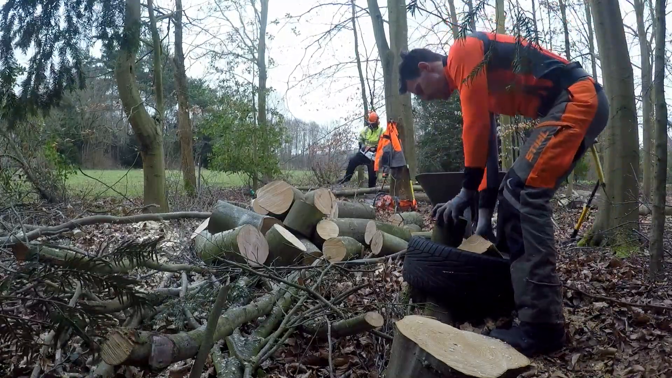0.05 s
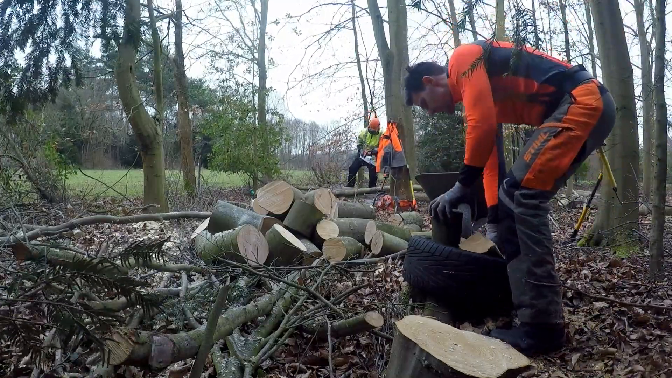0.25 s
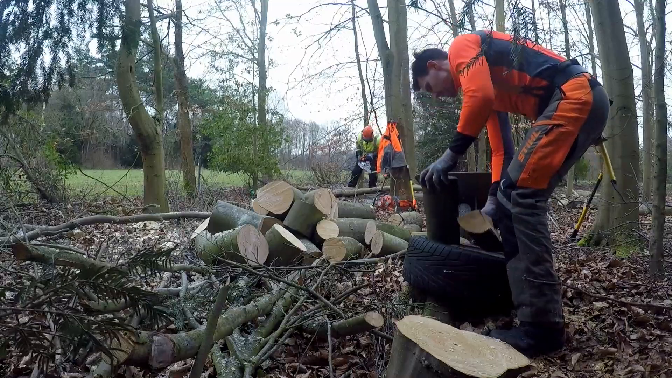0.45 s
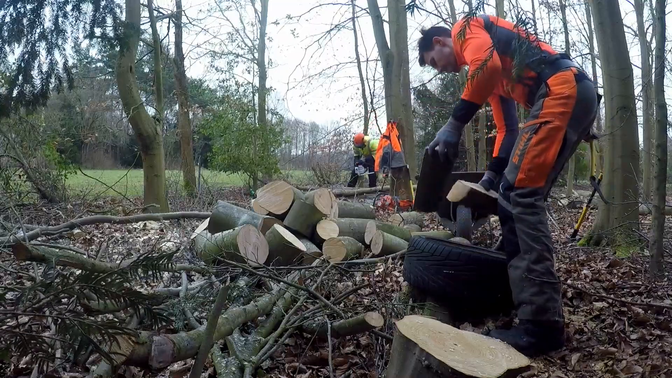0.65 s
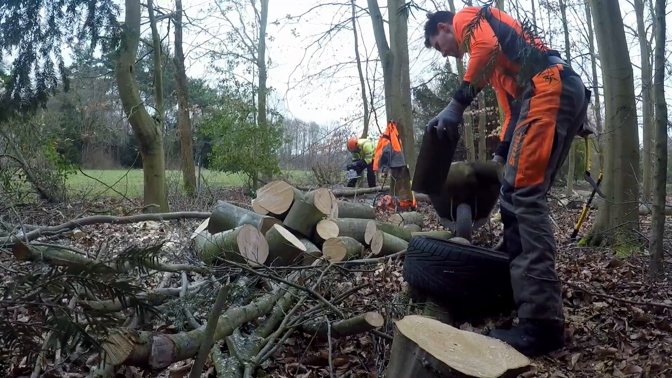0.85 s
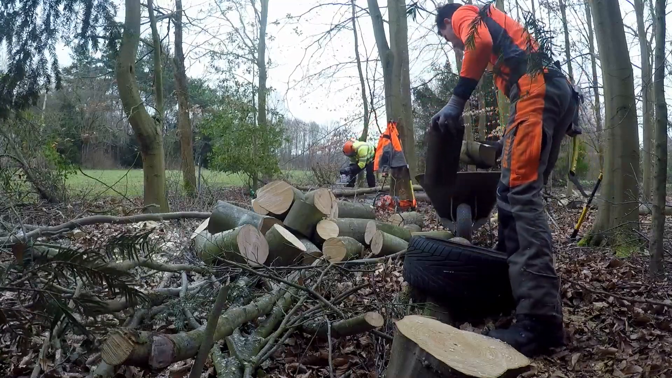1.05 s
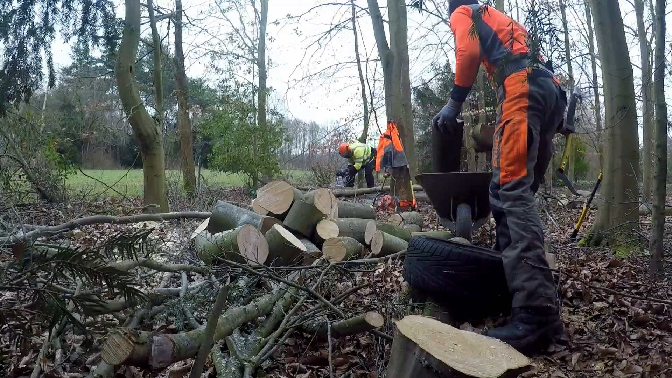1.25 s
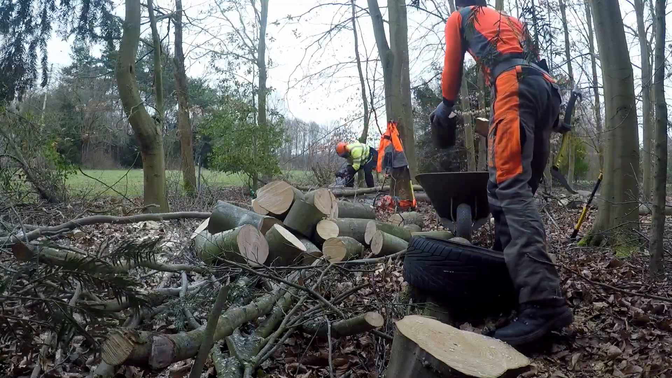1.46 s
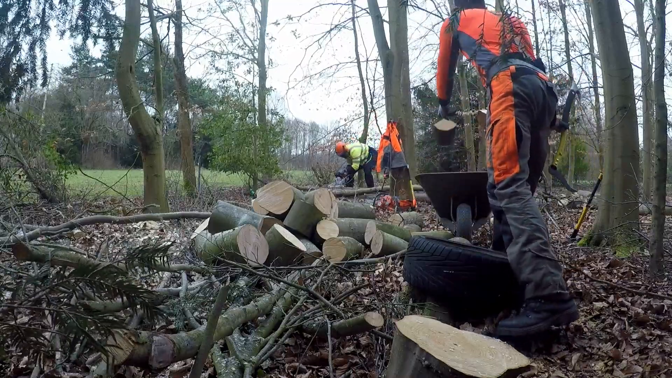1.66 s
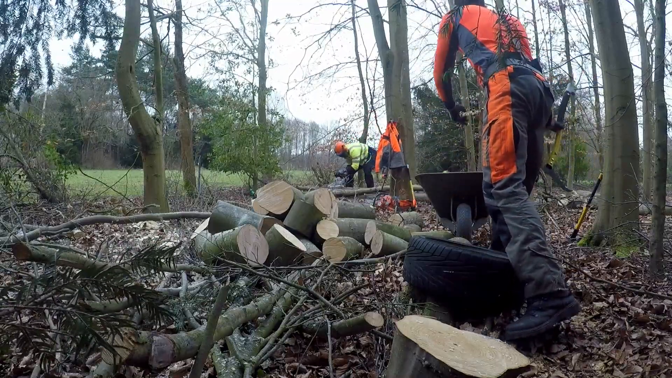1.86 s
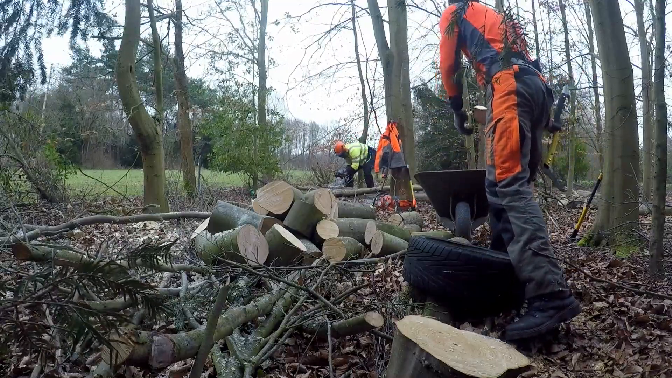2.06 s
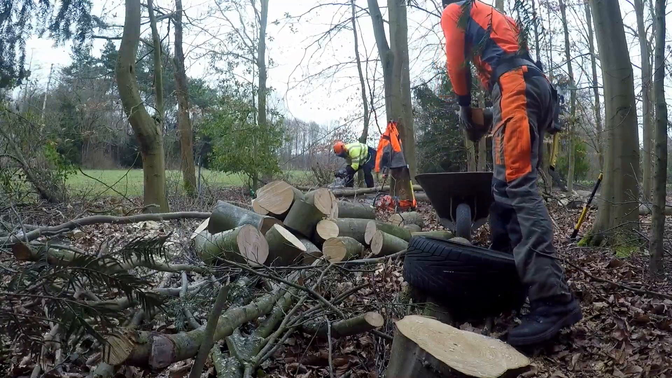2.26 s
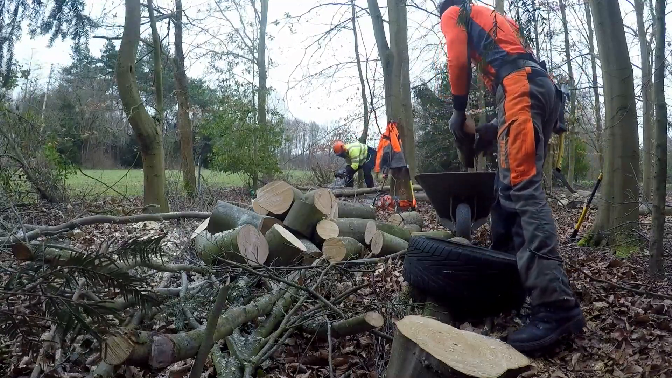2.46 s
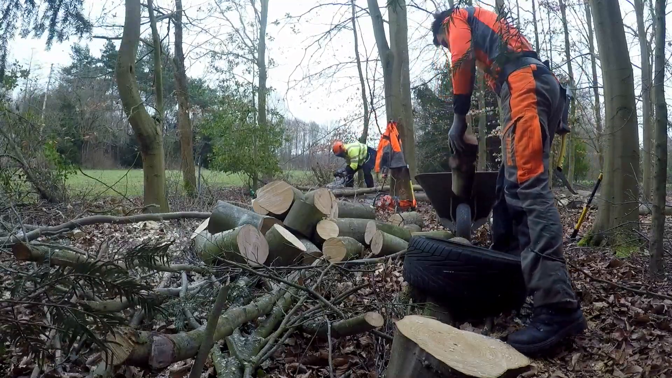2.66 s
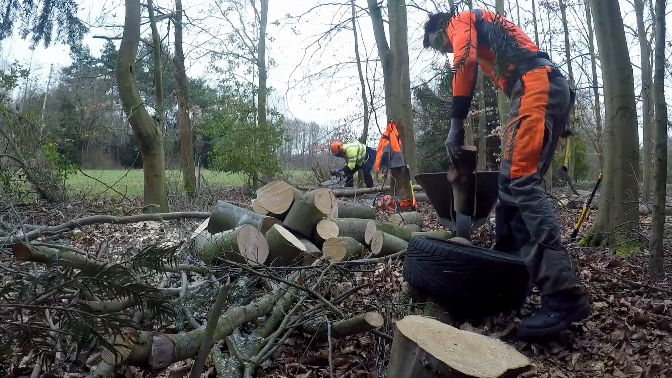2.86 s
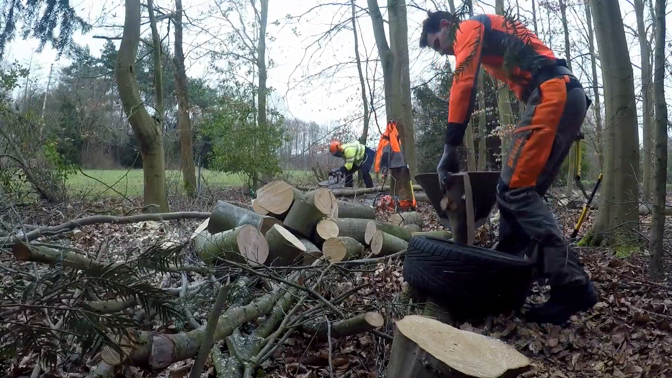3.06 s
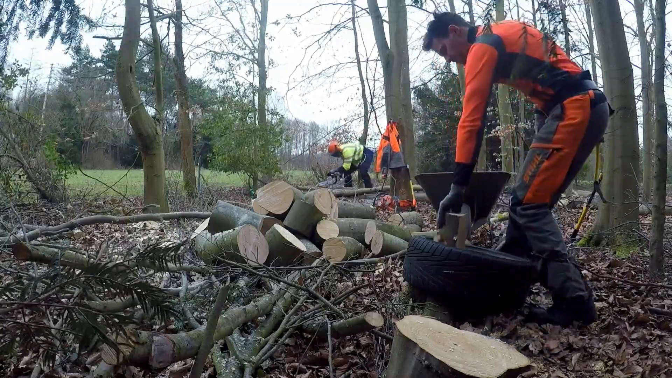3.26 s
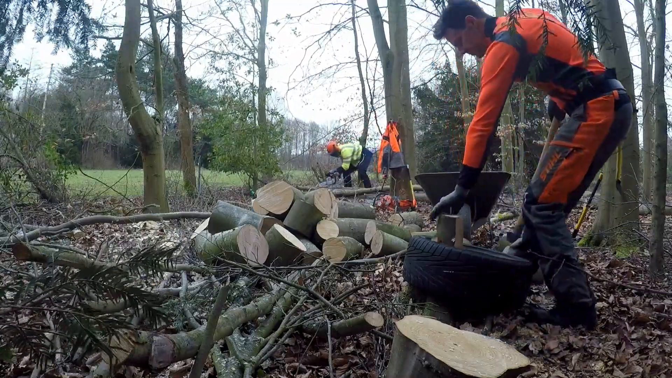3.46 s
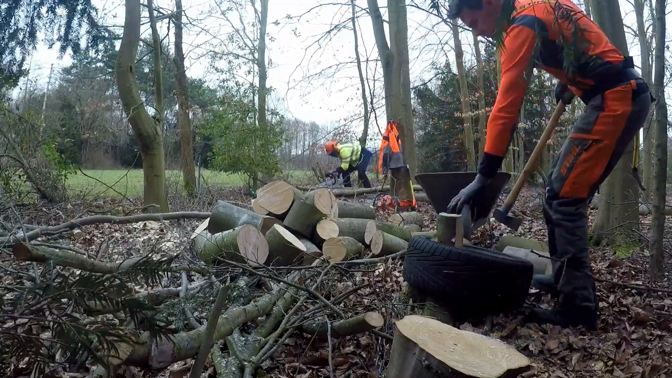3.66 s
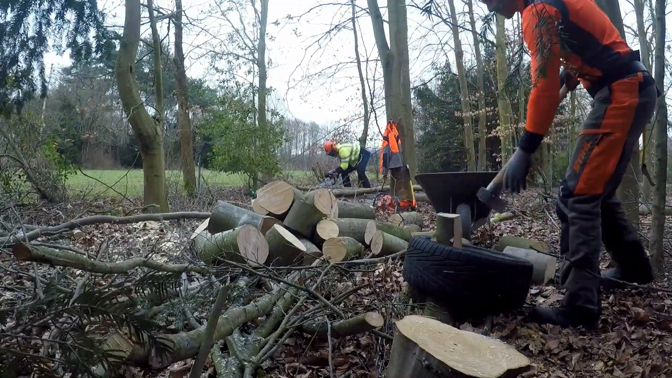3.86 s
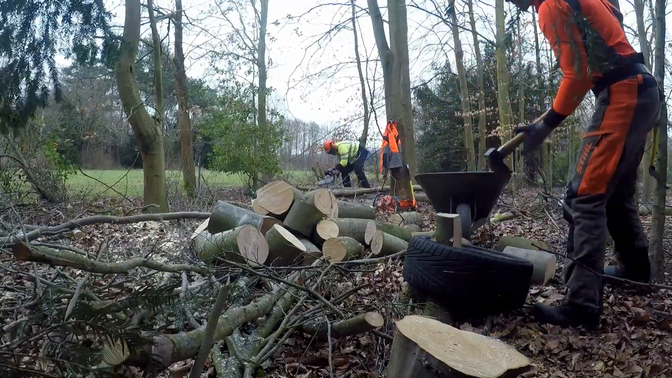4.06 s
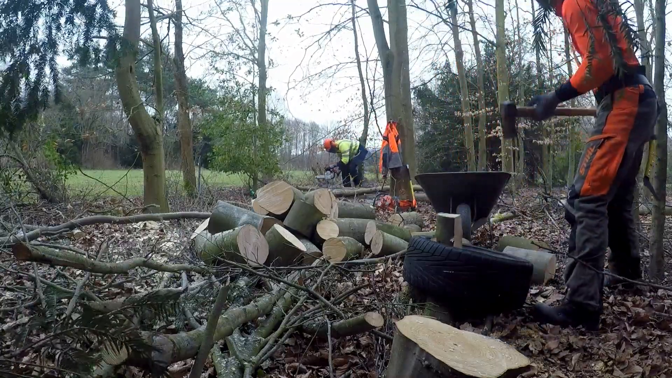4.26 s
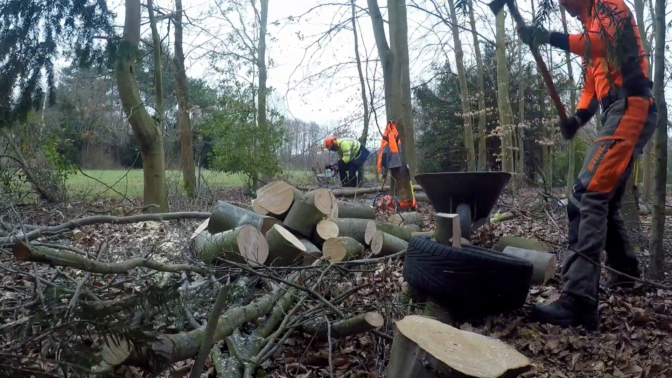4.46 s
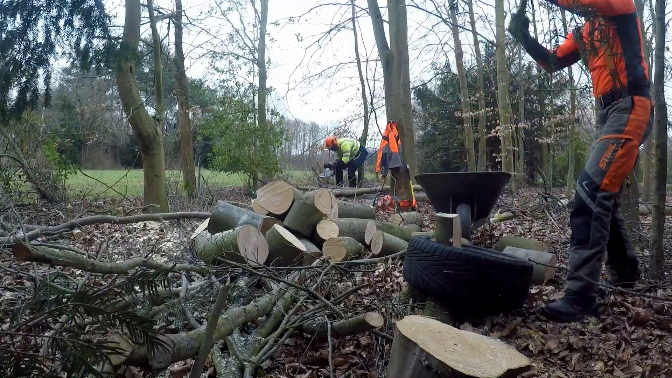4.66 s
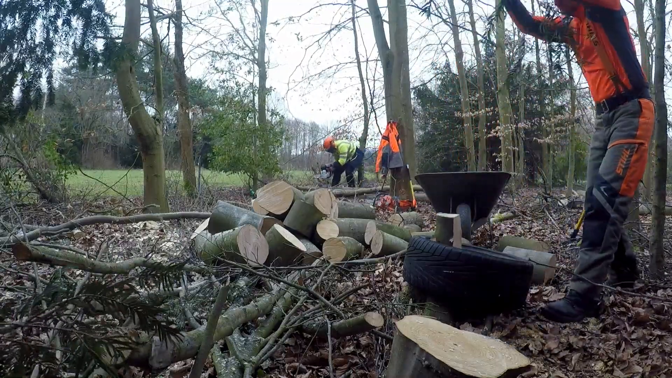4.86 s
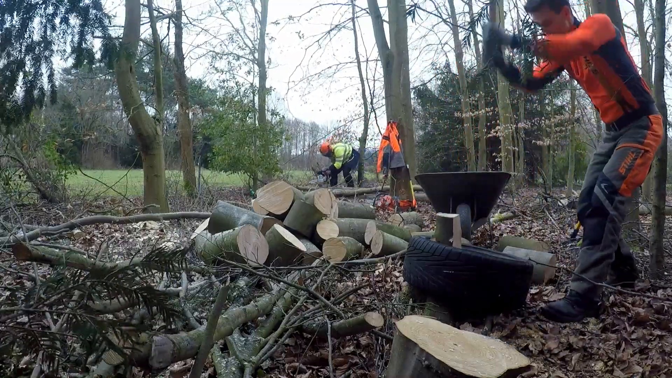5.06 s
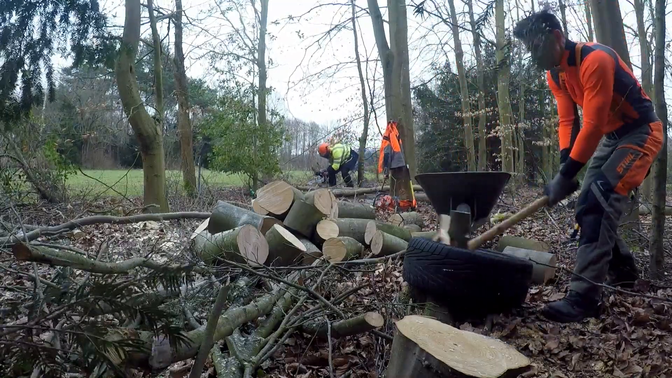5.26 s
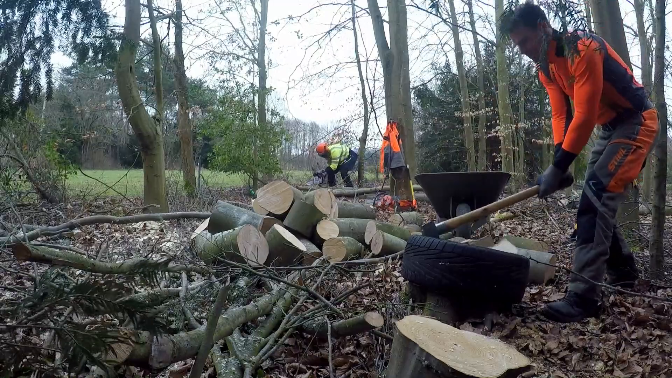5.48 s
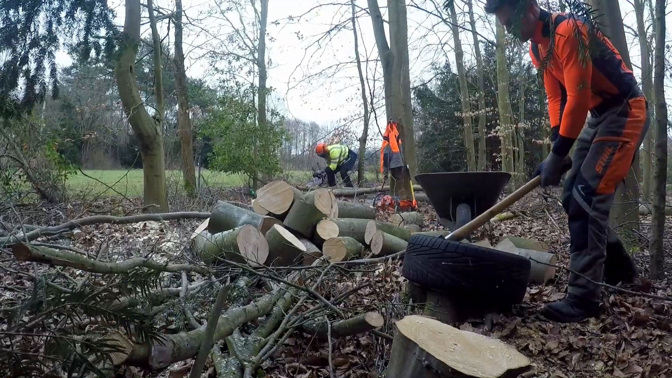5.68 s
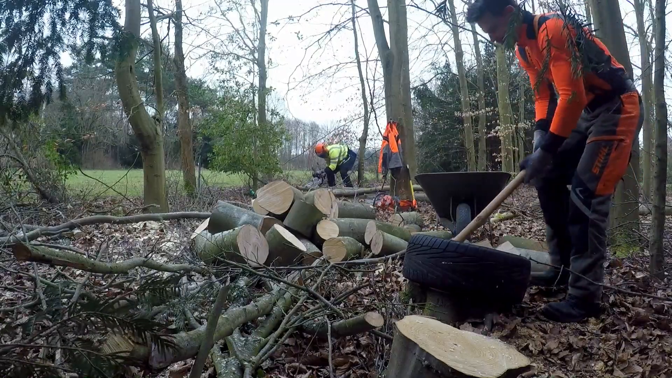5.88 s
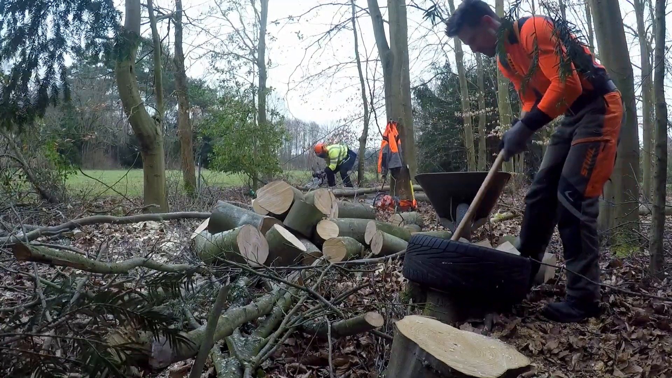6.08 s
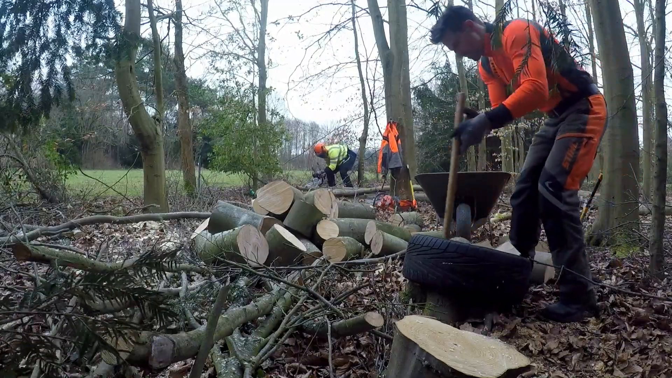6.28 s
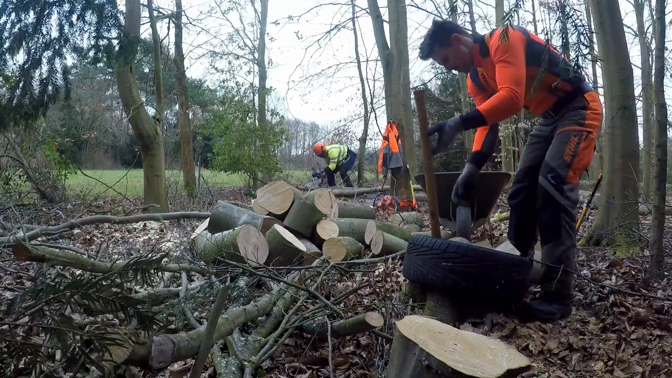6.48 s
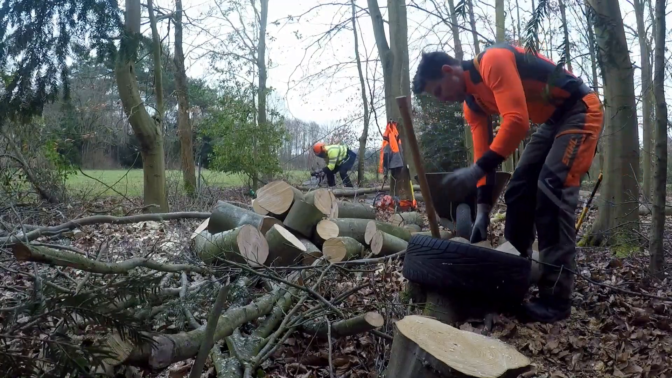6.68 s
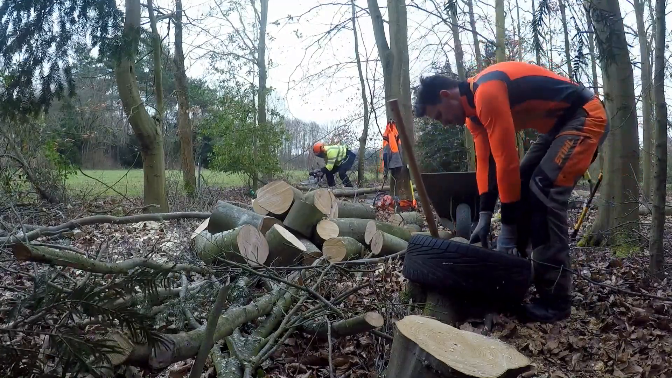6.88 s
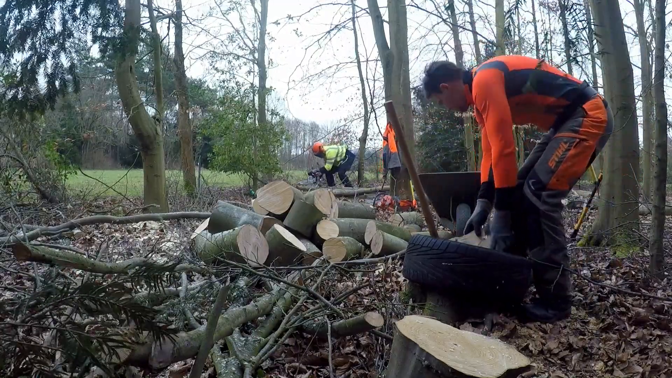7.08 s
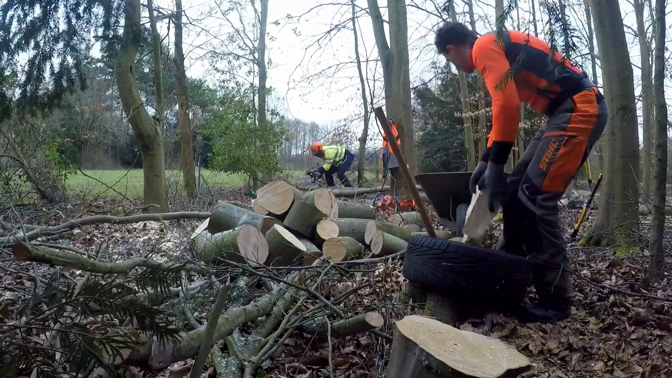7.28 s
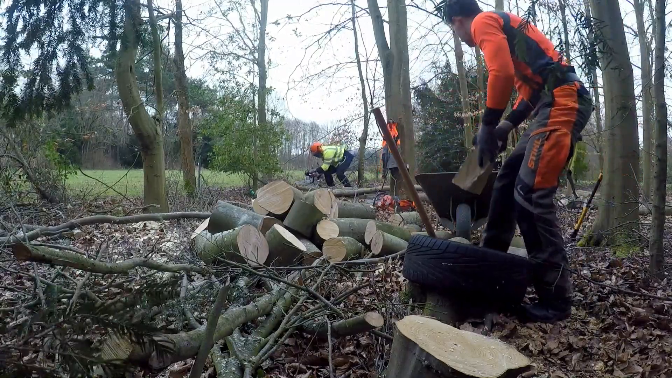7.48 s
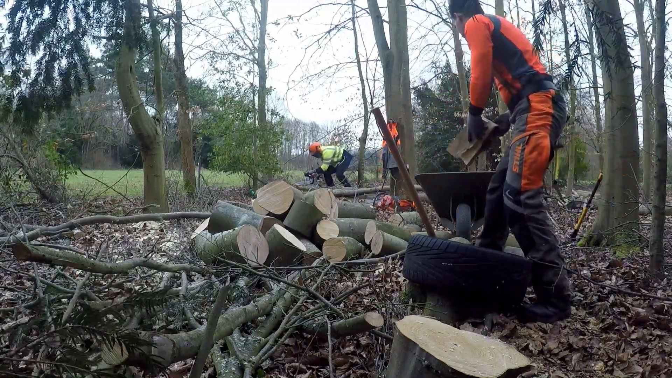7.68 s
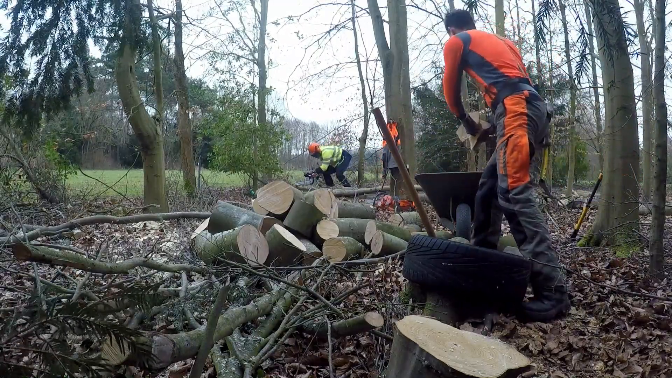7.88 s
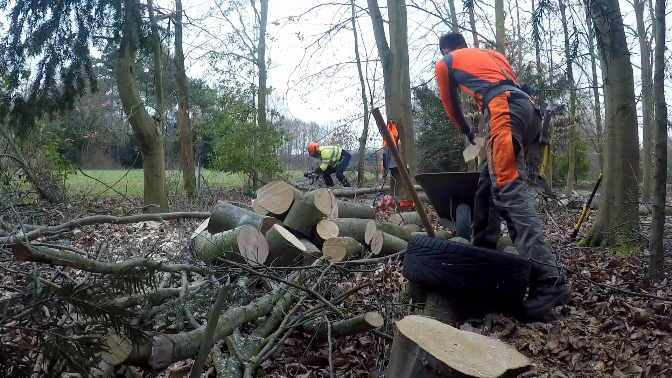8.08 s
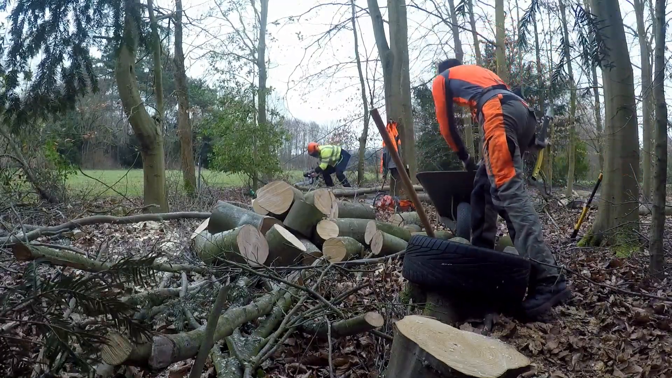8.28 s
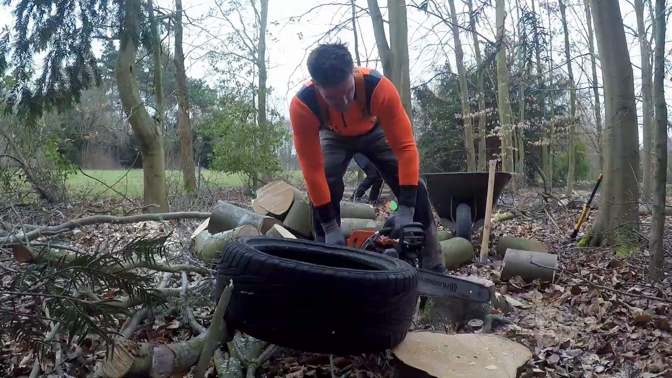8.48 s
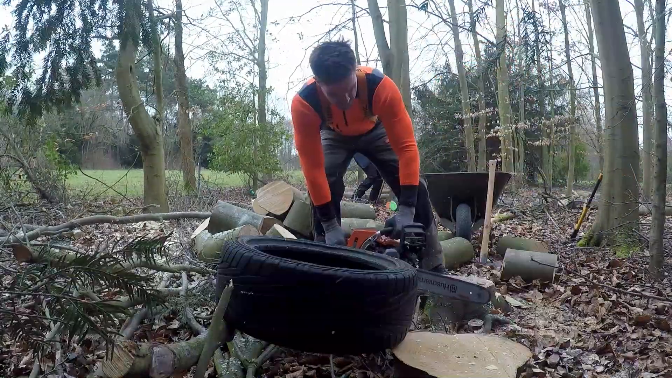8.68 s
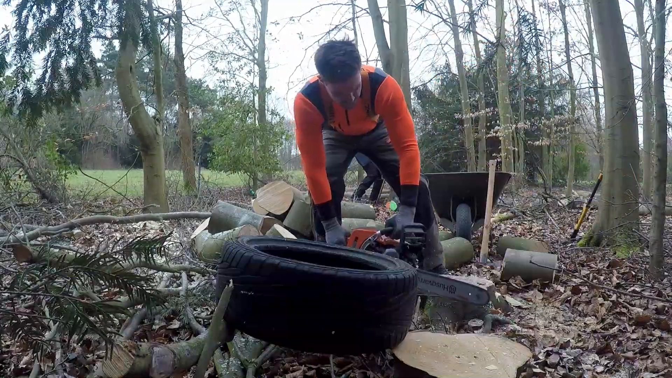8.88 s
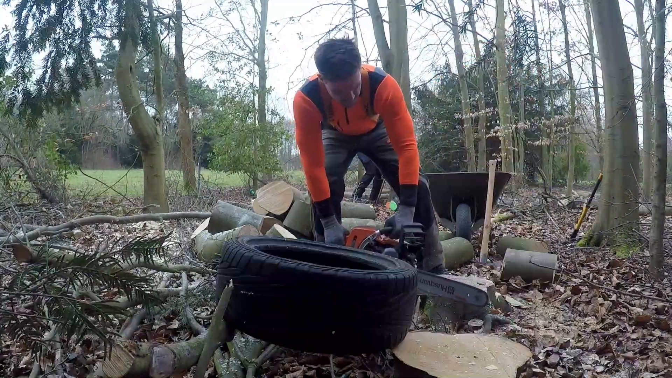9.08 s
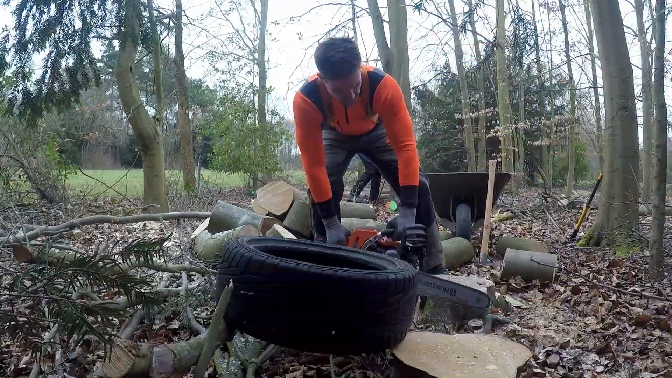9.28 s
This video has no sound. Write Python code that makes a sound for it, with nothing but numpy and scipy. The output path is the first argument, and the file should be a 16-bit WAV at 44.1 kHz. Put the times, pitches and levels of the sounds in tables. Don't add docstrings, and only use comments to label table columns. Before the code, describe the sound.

In a windy wood a far two-stroke saw idles and revs while logs thump and an axe splits one, cutting abruptly to a nearby saw.

```python
import sys
import numpy as np
from scipy import signal
from scipy.fft import rfft, irfft, next_fast_len
from scipy.io import wavfile
from scipy.ndimage import uniform_filter1d

SR = 44100
rng = np.random.default_rng(int(sys.argv[2]) if len(sys.argv) > 2 else 0)


def store_wav(level_fs):
    pcm = np.round(np.clip(np.atleast_2d(level_fs), -1, 1) * 32767)
    wavfile.write(sys.argv[1], SR, pcm.T.astype(np.int16))


def linear_from_db(decibels):
    return 10 ** (np.asarray(decibels, float) / 20)


N = 411453
T = np.arange(N) / SR
PADDED = next_fast_len(N)
HZ = np.maximum(np.fft.rfftfreq(PADDED, 1 / SR), 1)


def rms_one(x):
    return x / np.sqrt(np.mean(x ** 2) + 1e-20)


def at_hz(points, hz):
    point_hz, point_db = np.array(points)[:, 0], np.array(points)[:, 1]
    return np.interp(np.log(hz), np.log(point_hz), point_db)


def in_time(rows, fade=0.04):
    s, *columns = np.transpose(rows)
    since_start = T - s[0] + fade * (s[0] < fade)
    until_end = s[-1] - T + fade
    gate = np.clip(np.minimum(since_start, until_end) / fade, 0, 1)
    return [gate] + [np.interp(T, s, c) for c in columns]


def colour(x, *spectra):
    gains = [linear_from_db(at_hz(points, HZ)) for points in spectra]
    shaped = irfft(rfft(x, PADDED) * np.prod(gains, axis=0), PADDED)[:N]
    return shaped / np.sqrt(np.mean(gains[0] ** 2))


def drift(rate, t=T):
    return np.interp(t, np.arange(2000) / (2 * rate), rng.standard_normal(2000)) * 1.532


def ring(x, hz, t60):
    r, w = linear_from_db(-60 / (t60 * SR)), 2 * np.pi * hz / SR
    return signal.lfilter([0, np.sin(w)], [1, -2 * r * np.cos(w), r * r], x + 1e-18)


def peak(x, hz, width):
    r = np.exp(-np.pi * width / SR)
    zeros = np.array([1, 0, -1]) * (1 - r * r) / 2
    return signal.lfilter(zeros, [1, -2 * r * np.cos(2 * np.pi * hz / SR), r * r], x)


def clicks(rows):
    out = np.zeros(N)
    out[[round(row[0] * SR) for row in rows]] = linear_from_db(np.array([row[1] for row in rows]))
    return out


def puff(x, rise, t60):
    a, r = np.exp(-1 / (rise * SR)), linear_from_db(-60 / (t60 * SR))
    decay = signal.lfilter([1], [1, -r], x + 1e-18)
    return signal.lfilter([1 - a], [1, -a], decay)


def soften(x, hz):
    return signal.lfilter(*signal.butter(2, hz, fs=SR), x)


# [t/s, level/dB]
WIND_GUSTS = [(0.0, -40), (0.57, -39.5), (1.8, -58), (2.25, -38), (3.12, -34), (3.33, -27), (3.6, -31.5),
              (4.15, -27), (4.6, -30.5), (4.95, -28.5), (5.27, -25.5), (5.7, -28), (6.55, -29.5),
              (7.75, -33), (8.31, -25.5), (8.8, -26.5), (8.96, -38), (9.33, -30)]
# [f/Hz, level/dB per Hz]
WIND_LOW = [(15, 2.5), (30, -18), (55, 2), (80, -3.5), (120, -33), (400, -54.5)]
WIND_HIGH = [(40, -34), (85, 4.5), (130, 3), (220, -4.5), (330, -15.5), (400, -41), (900, -74)]
# [t/s, peak level/dB]
WIND_SLAPS = [(3.129, -16.5), (4.03, -5.5), (4.149, -14), (4.302, -30), (4.56, -16), (4.588, -9.5),
              (4.61, -17), (4.639, -9.5), (4.665, -15), (4.689, -10.5), (4.72, -29), (4.749, -7.5),
              (5.078, -12.5), (5.789, -10), (6.107, -16), (6.65, -12.5), (7.06, -27), (7.371, -26),
              (7.66, -19.5)]


def wind():
    _, wind_db = in_time(WIND_GUSTS)
    low, high = rng.standard_normal((2, N))
    low_db = wind_db + 1.06 * drift(12)
    high_db = wind_db + 0.49 * (wind_db + 29.0) - 0.5 + 2.4 * drift(11)
    low = linear_from_db(low_db) * rms_one(colour(low, WIND_LOW))
    high = linear_from_db(high_db) * rms_one(colour(high, WIND_HIGH))
    slaps = soften(clicks(WIND_SLAPS), 450)
    thump = ring(slaps, 94, 0.065) + 0.5 * ring(slaps, 170.0, 0.11) + 0.167 * ring(slaps, 293, 0.11)
    return low + high + thump


# [t/s, peak level/dB, boom f/Hz, length/s]
BARROW_BLOWS = [(0.198, -10.5, 200, 0.043), (0.241, -16, 195, .065), (0.273, -3.5, 199, 0.057),
                (0.304, -15, 201, 0.055), (0.32, -9.5, 179, 0.056), (0.362, -9, 203, 0.078),
                (0.398, -19, 206, 0.077), (0.427, -21, 195, .07), (1.902, -11, 215, 0.031),
                (1.92, -9, 235, 0.052), (1.939, -6, 180, 0.042), (1.953, -2, 214, 0.037),
                (1.968, -11, 195, .06), (1.983, -4.5, 190, 0.049), (2.004, -14, 187, .065),
                (2.03, -10.5, 194, 0.057), (2.055, -14.5, 189, 0.064), (2.095, -12, 205, 0.062),
                (2.129, -8.5, 205, .075), (2.168, -8, 192, 0.086), (2.196, -18, 200, .06),
                (2.231, -16, 200, 0.048), (2.256, -13.5, 200, .06), (8.25, -9, 200, 0.033),
                (8.266, -4, 190, 0.039), (8.286, -3, 197, .045), (8.307, -2, 202, 0.032),
                (8.322, -2.5, 218, 0.056), (8.36, -10.5, 212, 0.093), (8.393, -12, 186, 0.081)]
# [t/s, peak level/dB, boom f/Hz, length/s]
TYRE_BLOWS = [
    (3.258, -1.5, 100, 0.066),
    (3.331, -14.5, 70, .14),
    (5.258, -1.5, 95.6, 0.088),
    (5.31, -4.5, 92, 0.066),
    (5.397, -5, 91, 0.082),
    (5.417, -14, 93, 0.072),
    (5.816, -7, 92, 0.075),
]
OVERTONE_RATIO, OVERTONE_DB = 1.398, -12.5


def booms():
    out = np.zeros(N)
    t = T[:SR // 3]
    for s, peak_db, hz, length in BARROW_BLOWS + TYRE_BLOWS:
        start = round(s * SR)
        swell = (1 - np.exp(-t * hz * 1.47)) ** 2 * linear_from_db(-60 * (t / length) ** 1.56)
        first = np.sin(2 * np.pi * hz * t)
        second = linear_from_db(OVERTONE_DB) * np.sin(2 * np.pi * OVERTONE_RATIO * hz * t)
        out[start:start + len(t)] += linear_from_db(peak_db + 3.0) * swell * (first + second)
    return out


# [t/s, peak level/dB]
HARD_LANDINGS = [
    (.272, -10.5),
    (1.904, -20.5),
    (1.926, -7),
    (1.938, -19.5),
    (1.956, -35),
    (2.259, -21),
    (8.247, -9),
    (8.265, -12.5),
    (8.31, -18),
]
# [f/Hz, width/Hz, level/dB]
LOG_RINGS = [(340, 50, 9), (570, 50, 6), (640, 50, 4), (750, 30, 9), (905, 30, 6), (1170, 35, 8),
             (1290, 40, 11), (1900, 80, 8)]
# [f/Hz, level/dB per Hz]
CLATTER = [(130, -30), (300, 4), (420, 7.5), (600, 8), (1300, 2), (2300, -2.5), (3200, -29)]
LANDING_EDGE = [(1200, -18), (2500, 4), (6000, 4), (8000, -15.5), (13000, -38)]


def clatter():
    hard = clicks(HARD_LANDINGS)
    rattle = puff(hard, rise=0.00093, t60=0.35) * rng.standard_normal(N)
    rung = sum(linear_from_db(db) * peak(rattle, hz, width) for hz, width, db in LOG_RINGS)
    edge = puff(hard, rise=0.0041, t60=0.27) * rng.standard_normal(N)
    return linear_from_db(-13.5) * colour(rattle + rung, CLATTER) + linear_from_db(-16.0) * colour(edge, LANDING_EDGE)


# [t/s, peak level/dB]
SET_DOWN = [
    (3.2425, 0.5),
    (3.247, -16),
    (3.254, -9),
]
# [f/Hz, level/dB, t60/s]
BLOCK_MODES = [(169, 1, 0.046), (274, 0, 0.093), (380, 8, 0.017), (595, 9, 0.0079), (836, 4.5, 0.008),
               (1120, -9, 0.024), (1580, -9, .015)]


def log_set_down():
    landing = soften(clicks(SET_DOWN), 2000)
    modes = [linear_from_db(db) * ring(landing, hz, t60) for hz, db, t60 in BLOCK_MODES]
    return 0.33 * sum((-1) ** k * mode for k, mode in enumerate(modes))


# [t/s, peak level/dB]
KNOCKS = [
    (5.315, -32),
    (5.43, -30),
    (5.512, -27.5),
    (5.62, -23.5),
]


def knocks():
    return peak(ring(clicks(KNOCKS), 405, 0.083), 405, 90)


# [t/s, level/dB]
SINGING = [
    (5.212, -58),
    (5.222, -29),
    (5.231, -25),
    (5.235, -24),
    (5.245, -9.5),
    (5.248, -60),
]
BLADE_HZ = [2000, 2770, 3900, 5950]
# [f/Hz, level/dB, t60/s]
AXE_MODES = [(333, 5, 0.012), (740, 9.5, 0.0051), (1590, 4, 0.011), (2200, -30, .03), (3600, -22, .008),
             (5540, 3, 0.0049), (7300, 1.5, 0.0049)]
AXE_S, AXE_DB = 5.2458, 2


def axe():
    gate, sing_db = in_time(SINGING, fade=.002)
    blade = sum(rms_one(peak(peak(rng.standard_normal(N), hz, 200), hz, 300)) for hz in BLADE_HZ)
    crack = clicks([(AXE_S, AXE_DB), (AXE_S + 0.0077, AXE_DB - 36)])
    dulled = soften(crack, 8500)
    body = -.45 * sum(linear_from_db(db) * ring(dulled, hz, t60) for hz, db, t60 in AXE_MODES)
    splinter = puff(crack, rise=0.00036, t60=0.16) * rng.standard_normal(N)
    tail = colour(splinter, [(300, 8.5), (800, -4), (2500, -10.5), (6500, -15), (9000, -44), (15000, -52)])
    knock = clicks([(5.2725, -21)])
    block = ring(knock, 1440, 0.016) + ring(knock, 1880, 0.041)
    return gate * linear_from_db(sing_db) * blade / 2 + body + linear_from_db(-16.0) * tail + block


# [crank order, level/dB at 160 Hz]
FAN = [(5, -41), (8, -45), (9, -41), (10, -42), (11, -42), (12, -45), (13, -41), (14, -44), (15, -42),
       (16, -43), (17, -42), (18, -37.5), (19, -33), (20, -40), (21, -35), (22, -41), (23, -42)]
# [f/Hz, level/dB]
FAN_COVER = [(1600, 0), (1950, -4), (2300, 1), (2700, 2), (3100, -5), (3600, -2)]
THROTTLE_LAG_S, SHUT_HZ_PER_S = .1, -32


def engine(rev, orders, exhaust, second, sprocket_db, whine_db, bite_db, rough, scatter, fade, count,
           coast_until_s=0):
    gate, speed = in_time(rev, fade)
    on = gate > 0
    t, hz = T[on], speed[on]
    coasting = (np.gradient(hz) * SR < SHUT_HZ_PER_S) | (t < coast_until_s)
    shut = uniform_filter1d(1. * coasting, round(THROTTLE_LAG_S * SR))
    octaves = np.log2(hz / 150)
    first_db, second_db, burn_db, fan_db = [db + slope_db * octaves - lost_db * shut
                                            for db, slope_db, lost_db in orders]
    burn_db = burn_db - bite_db[0] * (1 - shut) * octaves
    second_db = second_db - bite_db[1] * (1 - shut) * octaves
    angle = 2 * np.pi * np.cumsum(hz) / SR
    tone = linear_from_db(first_db) * np.cos(angle)
    tone += linear_from_db(second_db + at_hz(second, 2 * hz)) * np.cos(2 * angle)
    for k in range(3, count):
        order_db = burn_db + at_hz(exhaust, k * hz) + sprocket_db * (k % 6 == 0) + 30 * rough * drift(17, t)
        wander = rough * np.sqrt(k) * drift(25, t) + scatter * rng.normal()
        tone += linear_from_db(order_db) * np.cos(k * angle + wander)
    for k, db in FAN:
        blade_db = db + fan_db + whine_db + at_hz(FAN_COVER, k * hz) + 2.2 * drift(12, t)
        wander = .3 * drift(20, t) + 3 * rng.normal()
        tone += linear_from_db(blade_db) * (hz / 160) ** 2.1 * np.cos(k * angle + wander)
    out = np.zeros((2, N))
    out[:, on] = np.sqrt(2) * gate[on] * tone, angle
    return out


# [f/Hz, level/dB]
POP_TILT = [(1000, -2.5), (2500, 5), (7000, 2), (12000, 6)]
# [f/Hz, level/dB per Hz]
ROAR = [(250, -79), (400, -5.5), (470, -2), (570, 3), (700, 0), (1300, -5), (1900, -2), (4000, -59)]
# [f/Hz, side over mid level/dB]
TOP_SIDE = [(9800, -50.5), (10300, -30), (11000, -9), (11800, -1.5), (15600, -4)]
RING_SWAY_DB = 2.5


def rasp(rows, roar_law, spectrum, rings, beat, bursts, fade):
    gate, rasp_db = in_time(rows, fade)
    steady = gate * linear_from_db(rasp_db + .4 * drift(12)) * rms_one(beat)
    mid, side, low = rng.standard_normal((3, N))
    mid = mid * steady + 0.51 * colour(mid * bursts, POP_TILT)
    side = side * steady + 0.43 * colour(side * bursts, POP_TILT)
    mid = mid + sum(linear_from_db(db + RING_SWAY_DB * drift(3)) * peak(mid, hz, width) for hz, width, db in rings)
    roar_db, ignored_swing = roar_law
    roar = colour(low * steady * linear_from_db(roar_db - ignored_swing * (rasp_db + 32.5)), ROAR)
    wide = .5 * side - .2 * mid + .55 * np.roll(mid, 1)
    return np.array([linear_from_db(-1.5) * colour(mid, spectrum) + roar, colour(wide, spectrum, TOP_SIDE)])


# [t/s, peak level/dB]
POPS = [(0.0588, -15), (0.1345, -16.5), (0.2266, -18), (0.3197, -20), (0.397, -13.5), (0.4776, -14.5),
        (0.57, -18), (0.6506, -15.5), (0.7286, -20.5), (0.7884, -18.5), (0.8682, -16), (0.9462, -18),
        (1.0033, -15), (1.075, -19.5), (1.1383, -16.5), (1.2136, -12.5), (1.267, -18), (1.315, -15.5),
        (1.3753, -16.5), (1.4611, -15), (1.5668, -18.5), (1.6596, -18.5), (1.757, -16), (1.837, -27),
        (1.8896, -15), (3.3878, -30), (3.462, -21), (3.5355, -25), (3.5964, -20), (3.6308, -14),
        (4.6535, -17), (4.777, -22), (4.9047, -20), (5.034, -19), (5.1595, -23), (5.4545, -32),
        (5.5873, -23), (5.684, -22), (5.781, -22.5), (5.879, -19.5), (5.9385, -20.5), (5.9763, -17),
        (6.0084, -19), (6.0378, -19), (6.086, -21), (7.1156, -25), (7.2285, -25), (7.3594, -21),
        (7.5517, -21), (7.8042, -20), (7.856, -19), (7.8875, -17)]
# [f/Hz, level/dB, t60/s]
POP_MODES = [(2570, -19, .03), (2950, -16, .03), (3950, -19, .03), (4200, -19, .03)]
# [t/s, level/dB]
IDLE = [
    (0, -32),
    (1.9, -40),
    (3.0, -45),
    (8.0, -43.5),
]
IDLE_HZ = 51.8


def idle(idle_turns, pops):
    gate, idle_db = in_time(IDLE)
    push = np.diff(np.floor(idle_turns), prepend=0) * linear_from_db(3.4 * drift(30)) + 0.044 * rng.standard_normal(N)
    growl = peak(peak(push, 218.0, 55), 180, 75)
    growl = growl + 0.12 * peak(peak(growl, 251, 47), 233, 66)
    thump = linear_from_db(-15.5) * ring(pops, 168.0, 0.17)
    casing = sum(linear_from_db(db) * ring(pops * linear_from_db(2.5 * drift(30)), hz, t60) for hz, db, t60 in POP_MODES)
    return gate * linear_from_db(idle_db) * rms_one(growl) + thump + casing


# [t/s, f/Hz]
REV_1 = [
    (2.1, 94.8),
    (2.2, 111.7),
    (2.35, 140.6),
    (2.414, 150.3),
    (2.528, 165.4),
    (2.64, 145),
    (2.756, 129.8),
    (2.888, 118.4),
    (3.02, 102.7),
]
REV_2 = [
    (3.62, 79.9),
    (3.722, 113.2),
    (3.816, 141.9),
    (3.878, 161.3),
    (3.93, 170.3),
    (4.03, 149.6),
    (4.13, 133.4),
    (4.24, 119.3),
    (4.35, 106.3),
]
REV_3 = [
    (5.95, 63.2),
    (6.05, 80.2),
    (6.143, 96.3),
    (6.317, 136.3),
    (6.414, 159),
    (6.53, 138.9),
    (6.65, 121.7),
    (6.85, 100.8),
]
REV_4 = [
    (7.79, 57),
    (7.9, 77.8),
    (7.974, 100.4),
    (8.14, 146.3),
    (8.24, 173),
    (8.29, 180.8),
    (8.44, 150.1),
]
# [orders level/dB, bite of upper orders, of the second/dB per octave down]
FACING = [
    (-3, 0.1, 4),
    (-2.9, 0.1, 0),
    (-1, -4, -2),
    (-3.5, 5, 13),
]
FACING_WHINE_DB = [2, 1.5, -2, -3]
# [level/dB at 150 Hz, dB per octave of speed, dB lost when shut]
FAR_ORDERS = [(-16.5, 22.5, 5.5), (-32.5, 4, 7), (-36, 14.5, 12.5)]
# [level/dB at 150 Hz, dB per octave of speed, dB lost when shut]
FAR_WHINE = (0, 0, 0.5)
# [f/Hz, level/dB]
FAR_EXHAUST = [(200, 3), (430, -9), (600, 5.5), (850, 2.5), (1300, -19), (2000, -6), (2800, -10),
               (4500, -50)]
# [f/Hz, level/dB]
FAR_SECOND = [(160, -11), (250, 5), (340, 0.5)]
# [t/s, level/dB]
FAR_RASP = [(0.0, -36), (1.22, -38.5), (1.3, -31), (1.9, -31.5), (2.5, -19.5), (3.03, -29.5), (3.6, -30.5),
            (3.9, -19), (4.32, -28), (5.19, -32.5), (5.28, -39.5), (5.95, -39), (6.28, -24), (6.42, -23.5),
            (6.86, -30.5), (7.6, -32.5), (7.82, -39), (7.92, -28), (8.25, -21), (8.44, -24.5)]
# [f/Hz, level/dB per Hz]
FAR_COLOUR = [(710, -16), (1200, -9.5), (1340, -4), (1690, -8), (2680, -1.5), (3180, -3), (3600, -3),
              (4250, -0.5), (5100, -5.5), (6190, -5.5), (7270, -19), (8450, -22), (10700, -36.5),
              (12700, -20), (14100, -27.5), (15600, -22)]
# [f/Hz, width/Hz, level/dB over the rasp]
FAR_RINGS = [(1360, 40, -5), (2570, 20, 1), (3445, 20, 4), (3735, 30, 4), (4200, 100, 2), (4500, 40, 0),
             (5200, 40, -2), (5790, 120, -4), (6160, 30, -2)]
# [level/dB over the rasp, share of the rasp's swing it ignores]
FAR_ROAR = (-9.5, 0.38)


def far_saw():
    tone, angle = np.zeros((2, N))
    for rev, facing, whine_db in zip((REV_1, REV_2, REV_3, REV_4), FACING, FACING_WHINE_DB):
        facing_db, *bite_db = facing
        rev_tone, rev_angle = engine(rev, FAR_ORDERS + [FAR_WHINE], FAR_EXHAUST, FAR_SECOND, sprocket_db=2.5,
                                     whine_db=whine_db, bite_db=bite_db, rough=.04, scatter=2.5, fade=.07,
                                     count=13)
        tone += linear_from_db(facing_db) * rev_tone
        angle += rev_angle
    idle_turns = np.cumsum(IDLE_HZ * (1 + 0.0206 * drift(4))) / SR
    pops = clicks(POPS) * linear_from_db(-0.5)
    bursts = linear_from_db(0.5) * puff(pops, rise=0.0017, t60=0.033)
    bursts = bursts + linear_from_db(-35.5) * puff(pops, rise=0.088, t60=0.95)
    revving = tone != 0
    beat = 1 + 0.072 * np.cos(angle) * revving + 0.16 * np.cos(2 * np.pi * idle_turns) * ~revving
    out = rasp(FAR_RASP, FAR_ROAR, FAR_COLOUR, FAR_RINGS, beat, bursts, fade=0.096)
    out[0] += tone + idle(idle_turns, pops)
    return out


# [first turn, last turn, firings, peak level/dB]
MISFIRES = [
    (2, 2, 1, -9),
    (6, 14, 3, -10),
    (17, 21, 2, -10.5),
    (24, 33, 4, -10.5),
    (35, 51, 9, -10.5),
]
FIRING_LEAD_TURNS = .13
FIRING_SPREAD_DB = 1.8


def firings(angle):
    turns = np.maximum.accumulate(angle) / (2 * np.pi) + FIRING_LEAD_TURNS
    rows = []
    for first, last, count, db in MISFIRES:
        for turn in np.linspace(first, last, round(count)):
            rows.append((np.searchsorted(turns, turn) / SR, db + FIRING_SPREAD_DB * rng.normal()))
    return clicks(rows)


# [t/s, f/Hz]
NEAR_REV = [(8.4434, 143.1), (8.5, 135.5), (8.55, 125.3), (8.67, 116.0), (8.76, 112.3), (8.81, 105.9),
            (8.865, 109.6), (8.93, 125.4), (9.0, 146.7), (9.09, 162.8), (9.19, 180.8), (9.33, 176.8)]
# [level/dB at 150 Hz, dB per octave of speed, dB lost when shut]
NEAR_ORDERS = [(-11, 7.5, 3.8), (-17, 2, 13.3), (-31.5, 4, 9.2), (-14, 7, 0.1)]
# [f/Hz, level/dB]
NEAR_EXHAUST = [(300, -4), (520, 5), (720, -2.5), (1020, 2.5), (1600, -2.5), (2250, 0.5), (2750, -5),
                (3200, -7), (3600, -10), (3900, 3.5), (4300, -11), (4800, -27)]
# [f/Hz, level/dB]
NEAR_SECOND = [(215, -3), (295, 4.5), (360, -5)]
# [t/s, level/dB]
NEAR_RASP = [
    (8.44, -20),
    (8.65, -23.5),
    (8.85, -23),
    (8.95, -21),
    (9.282, -19.5),
    (9.33, -22),
]
# [f/Hz, level/dB per Hz]
NEAR_COLOUR = [(710, -12), (1200, -12), (1590, -11), (1840, -7), (2140, -8), (2700, -10), (3320, -13),
               (3900, 0), (4740, -10), (6330, -8.5), (9710, -38), (10900, -63), (11800, -25.5),
               (13100, -20.5), (14800, -31), (15600, -45)]
# [f/Hz, width/Hz, level/dB over the rasp]
NEAR_RINGS = [(2250, 80, 2), (2600, 60, -4), (3730, 64, 0), (5030, 80, 6), (6200, 38, -5)]
# [level/dB over the rasp, share of the rasp's swing it ignores]
NEAR_ROAR = (-14, .9)
# [f/Hz, level/dB, t60/s]
MUFFLER = [(262, 6.5, 0.027), (468, 1.5, 0.024), (916, 5, 0.015), (1630, 4, 0.013), (2156, -3.5, 0.052),
           (3370, -6.5, 0.037), (3770, -13, 0.034), (4100, -18, 0.028)]
CATCH_S = 8.85


def near_saw():
    tone, angle = engine(NEAR_REV, NEAR_ORDERS, NEAR_EXHAUST, NEAR_SECOND, sprocket_db=4, whine_db=0,
                         bite_db=(0, 0), rough=.02, scatter=.5, fade=.004, count=34, coast_until_s=CATCH_S)
    fired = firings(angle)
    bursts = linear_from_db(-8.5) * puff(fired, rise=.0005, t60=.035)
    beat = 1 + 0.047 * np.cos(angle)
    out = rasp(NEAR_RASP, NEAR_ROAR, NEAR_COLOUR, NEAR_RINGS, beat, bursts, fade=.004)
    muffler = sum(linear_from_db(db) * ring(fired, hz, t60) for hz, db, t60 in MUFFLER)
    out[0] += tone + linear_from_db(-6.0) * muffler
    return out


HANDOVER_S, HANDOVER_FADE_S = 8.448, .0025
LOW_CUT_HZ = 36.5


def scene():
    near = (T - HANDOVER_S) / HANDOVER_FADE_S
    mid, side = far_saw() * np.clip(-near, 0, 1) + near_saw() * np.clip(near, 0, 1)
    airborne = mid + booms() + clatter() + log_set_down() + knocks() + axe()
    port = signal.butter(4, LOW_CUT_HZ, "high", fs=SR, output="sos")
    mid = signal.sosfilt(port, airborne) + wind()
    return np.array([mid + side, mid - side])


def top_cut(x):
    return signal.sosfilt(signal.butter(12, 15720, fs=SR, output="sos"), x)


def record(dry):
    top = .94
    rounded = top * dry / (1 + np.abs(dry / top) ** 6) ** (1 / 6)
    treble_end = signal.cheby2(16, 70, 15800, fs=SR, output="sos")
    finished = signal.sosfilt(treble_end, rounded)
    return top_cut(finished)


dry = scene()
out = record(dry)
store_wav(out)
```